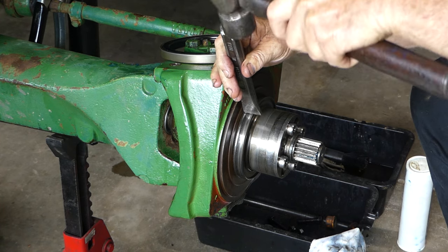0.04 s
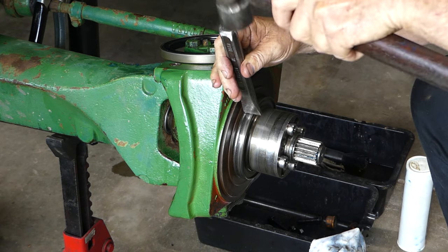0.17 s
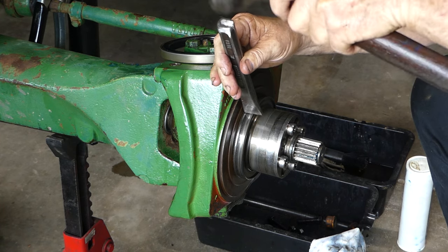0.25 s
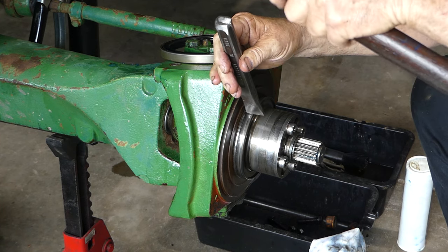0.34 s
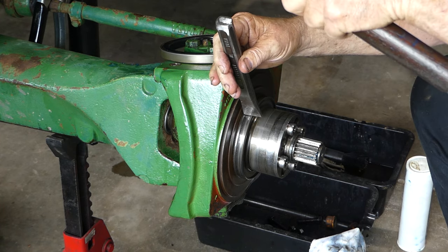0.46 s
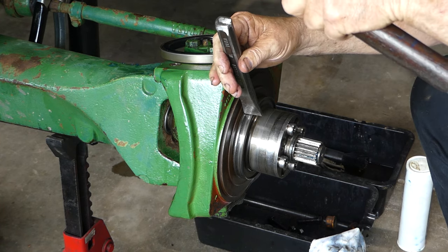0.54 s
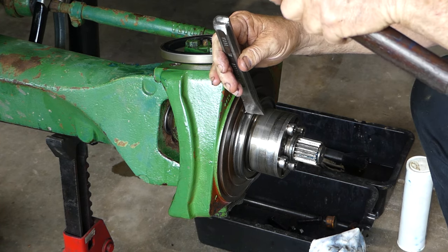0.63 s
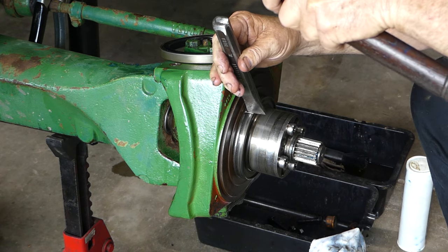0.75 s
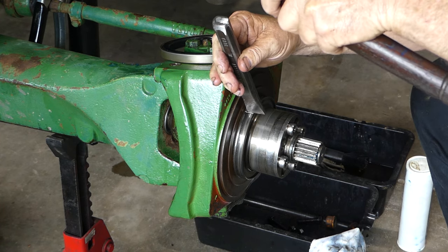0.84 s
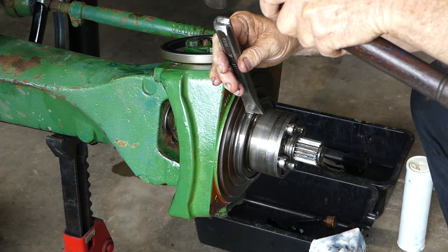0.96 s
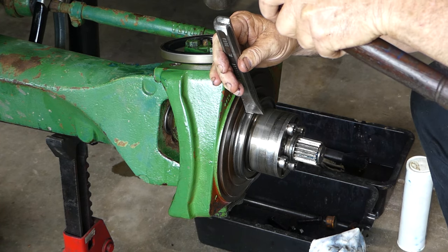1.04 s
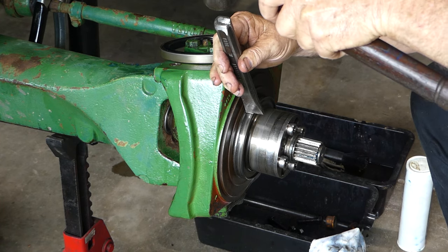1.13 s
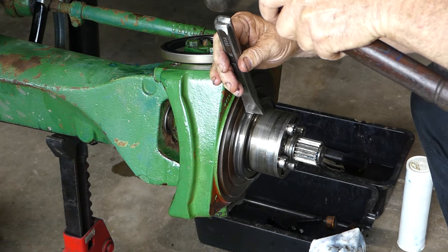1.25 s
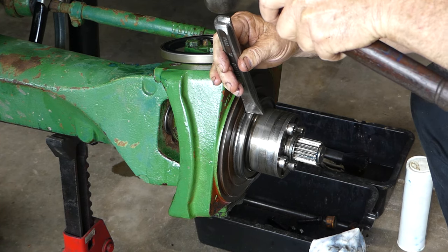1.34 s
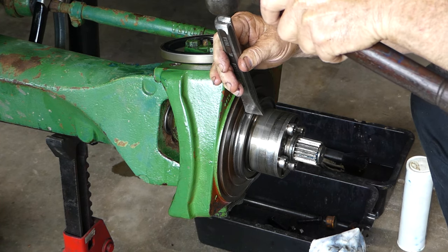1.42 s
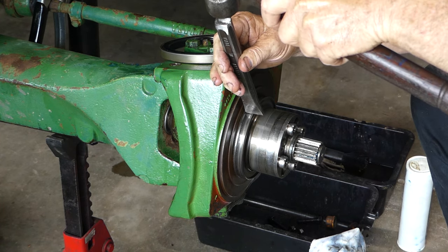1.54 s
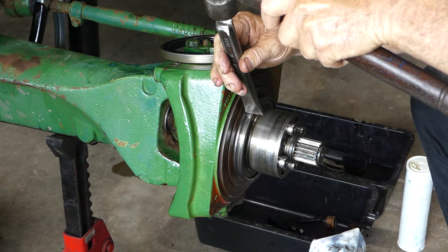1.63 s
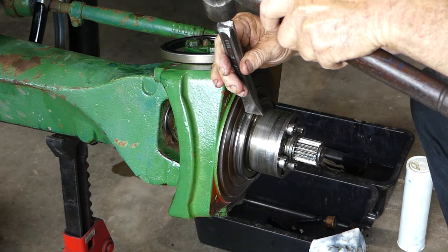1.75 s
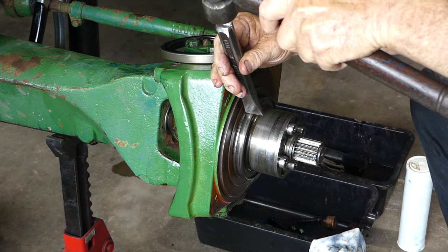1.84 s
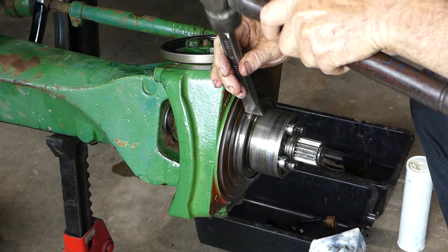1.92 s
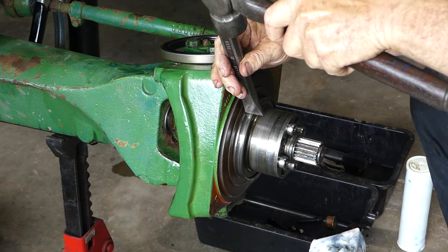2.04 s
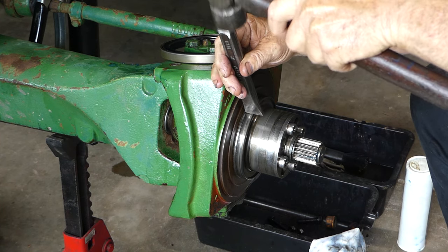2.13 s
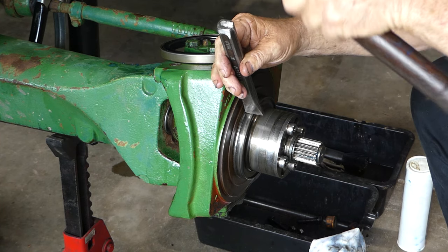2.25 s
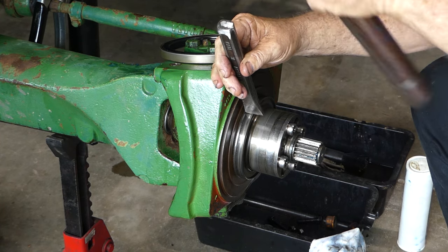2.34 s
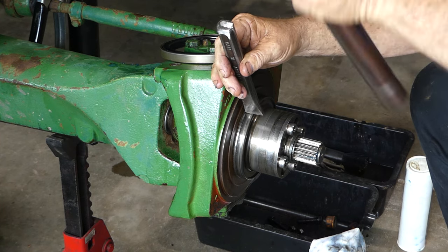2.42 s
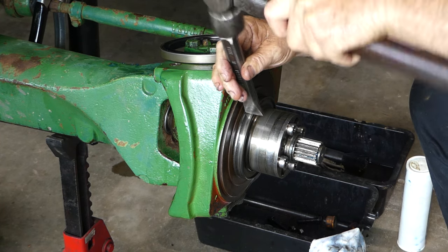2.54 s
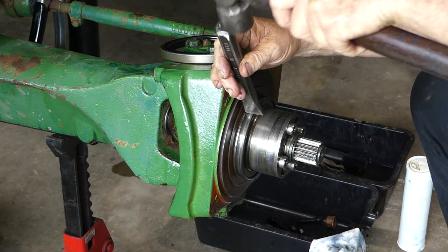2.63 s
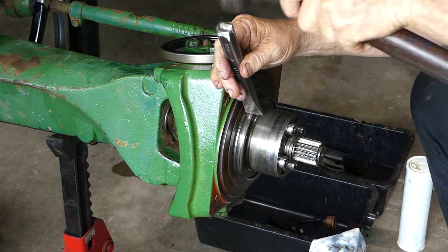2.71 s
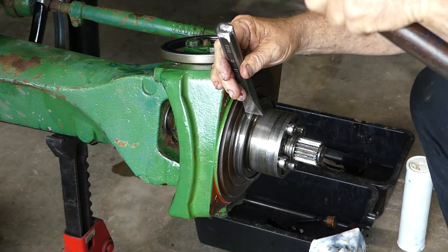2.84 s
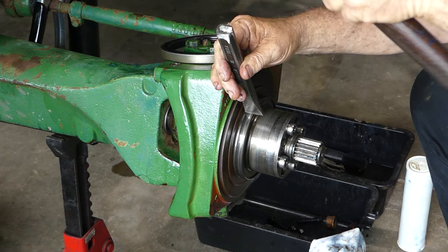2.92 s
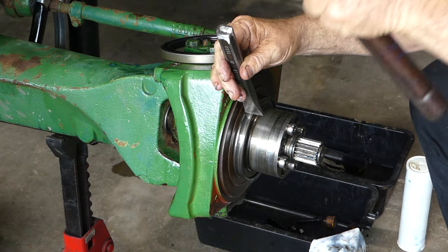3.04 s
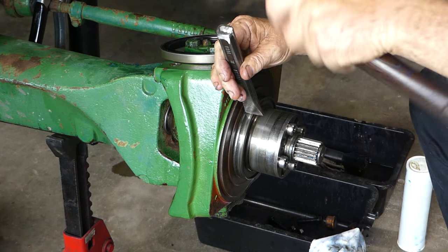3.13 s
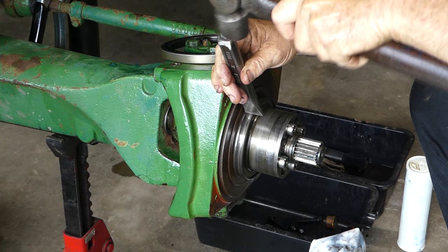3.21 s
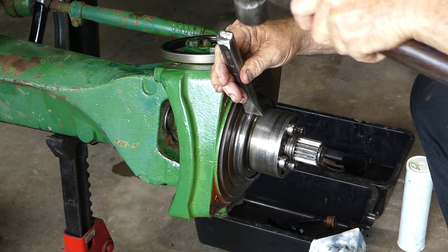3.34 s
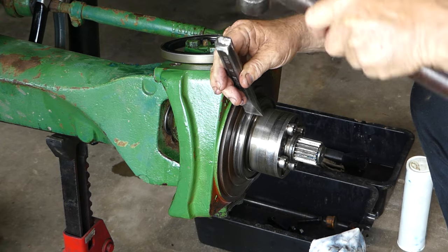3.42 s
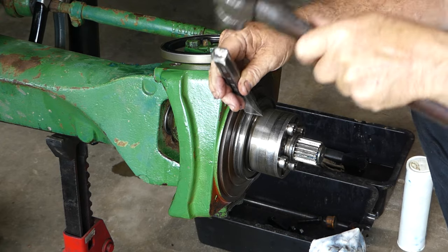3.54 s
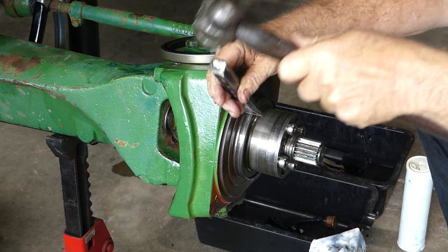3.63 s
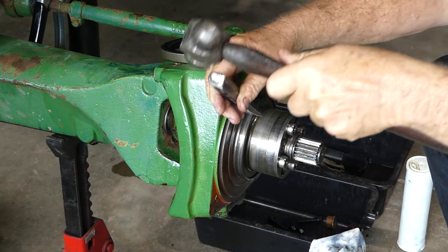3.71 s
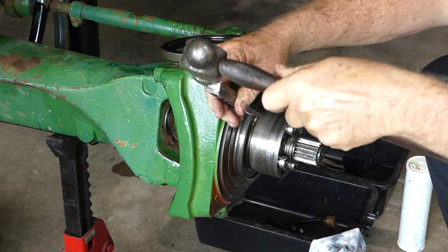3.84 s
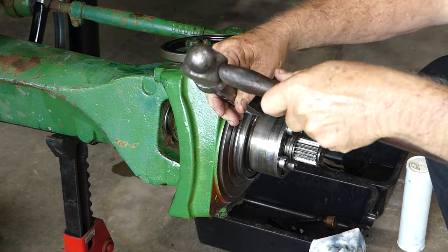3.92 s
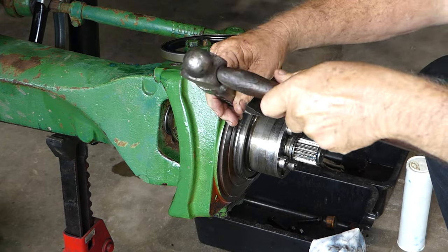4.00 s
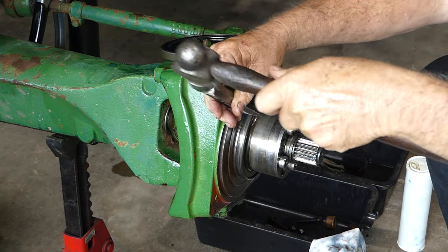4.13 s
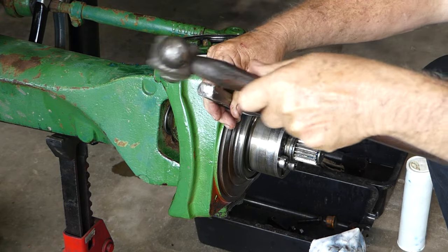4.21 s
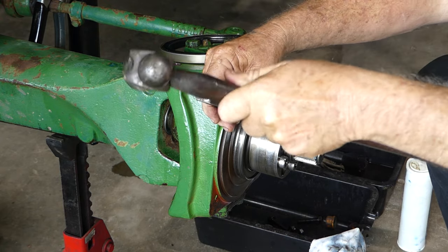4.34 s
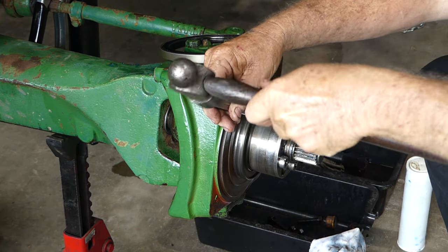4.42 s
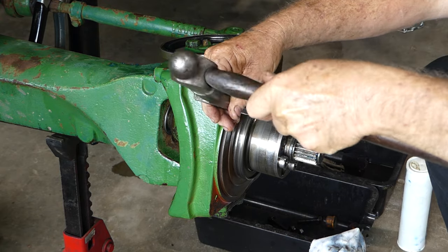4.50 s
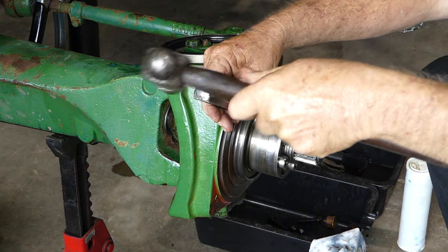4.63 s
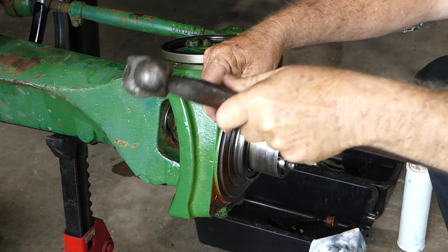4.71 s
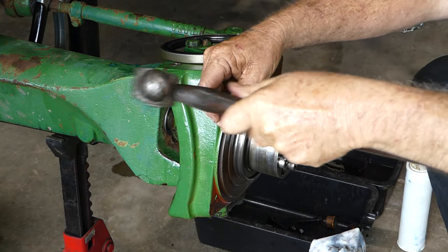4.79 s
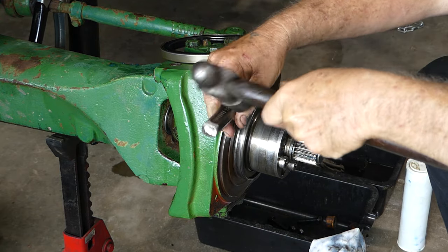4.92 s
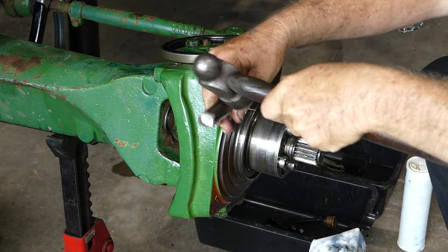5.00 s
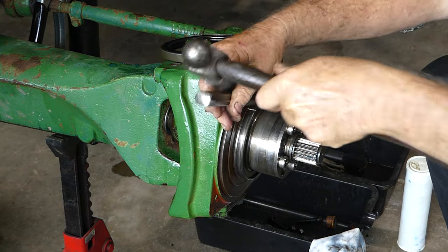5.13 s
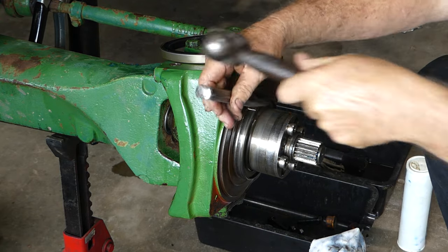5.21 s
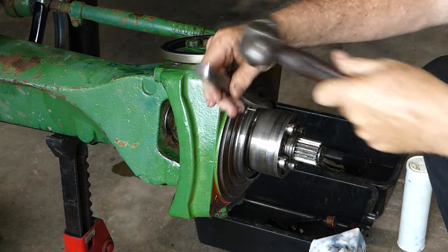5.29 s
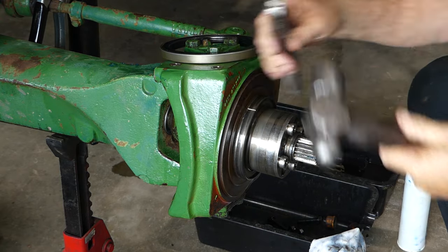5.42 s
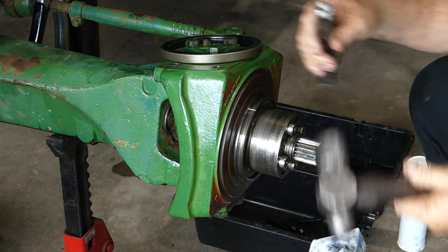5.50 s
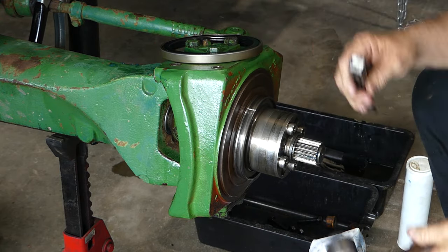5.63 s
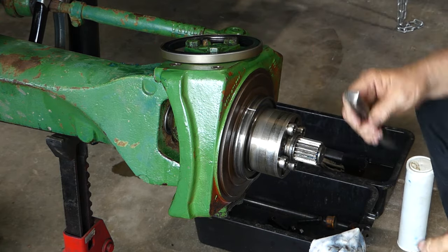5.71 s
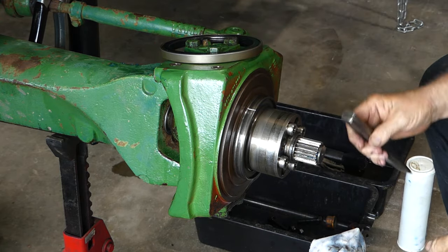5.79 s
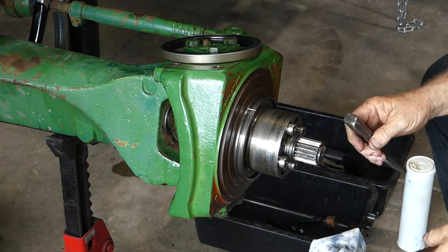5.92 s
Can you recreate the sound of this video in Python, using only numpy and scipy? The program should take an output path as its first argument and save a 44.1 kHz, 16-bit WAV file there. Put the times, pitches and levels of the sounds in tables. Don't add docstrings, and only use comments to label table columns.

```python
import sys
import numpy as np
from scipy import signal
from scipy.fft import rfft, irfft
from scipy.io import wavfile
from scipy.ndimage import uniform_filter1d, minimum_filter1d

SR = 44100
rng = np.random.default_rng(int(sys.argv[2]) if len(sys.argv) > 2 else 0)


def file_out(sig):
    cols = np.atleast_2d(sig).T
    lim = np.clip(cols, -1, 1)
    pcm = np.round(lim * 32767).astype(np.int16)
    wavfile.write(sys.argv[1], SR, pcm)


def invert_db(level):
    return 10 ** (np.asarray(level, dtype=float) / 20)


N = 262647

# (time [s], crack [dB], housing [dB], hub [dB], hammer head [dB])
BLOWS = [
    (.024, 12.5, -16, -16.5, -9.5),
    (1.434, -33.5, -51.5, -39, -70),
    (2.0124, -4, -30, -16.5, -47),
    (2.5868, 13.5, -12, -12.5, -17.5),
    (3.2079, 10.5, -12, -21.5, -25.5),
    (3.959, -0.5, -31.5, -16, -46.5),
    (4.4724, 9.5, -21, -5, -37),
    (4.921, 9, -26.5, -13.5, -8.5),
]
BLOW_S, CRACK_DB, HOUSING_DB, HUB_DB, HAMMER_DB = np.transpose(BLOWS)
# (frequency [Hz], density [dB per Hz])
AMBIENCE = [(15, -22), (30, -9), (60, 0), (120, 1), (270, 0), (500, -6), (1000, -13), (2000, -21),
            (4000, -23), (5600, -25), (6600, -31), (8000, -36), (13000, -39), (16000, -42)]
SOFT_BLOW_TILT = 0.07


def at_hz(points, hz):
    table_hz, values = np.array(points)[:, 0], np.array(points)[:, 1]
    return np.interp(np.log(hz), np.log(table_hz), values)


def coloured(spectrum, count):
    hz = np.maximum(np.fft.rfftfreq(count, 1 / SR), 5)
    x = irfft(rfft(rng.standard_normal(count)) * invert_db(at_hz(spectrum, hz)), count)
    return x / x.std()


def add(out, s, sound):
    i = round(s * SR)
    out[i:i + len(sound)] += sound[:N - i]


def struck(hz, db, t60, damped_s=9.):
    contact_s, choke_s = .0003, .002
    t = np.arange(int(min(1.3 * np.max(t60), damped_s + .01) * SR)) / SR
    hz, db, t60 = (np.reshape(v, (-1, 1)) for v in (hz, db, t60))
    swell = 1 - np.exp(-t / contact_s)
    choke = np.exp(-np.maximum(t - damped_s, 0) / choke_s)
    modes = invert_db(db - 60 * t / t60) * np.sin(2 * np.pi * hz * t)
    return swell * choke * np.sum(modes, axis=0)


def until_next(rows):
    return np.diff([row[0] for row in rows] + [N / SR])


def body(modes, levels_db, spread_db, tilt=0.):
    out = np.zeros(N)
    hz, db, t60 = np.transpose(modes)
    luck = rng.standard_normal((len(BLOWS), len(modes)))
    for s, level_db, chance in zip(BLOW_S, levels_db, luck):
        duller_db = tilt * (level_db - max(levels_db)) * np.log2(hz / 600)
        add(out, s, struck(hz, db + level_db + duller_db + spread_db * chance, t60))
    return out


def cracks():
    # (frequency [Hz], density [dB per Hz])
    crack_colour = [(90, -43.5), (180, -16.5), (520, -4.5), (1700, -5.5), (3300, 0.5), (5000, -1),
                    (7400, -4), (9000, -18), (12500, -22.5), (15000, -15), (17000, -24.5)]
    soft_ms, hard_ms, hard_from_db = 1.5, 3.7, 7.5
    near, far, t = np.zeros(N), np.zeros(N), np.arange(4096) / SR
    hz = np.maximum(np.fft.rfftfreq(4096, 1 / SR), 5)
    cepstrum = irfft(np.log(invert_db(at_hz(crack_colour, hz))))
    click = irfft(np.exp(rfft(cepstrum * np.r_[1, np.full(2047, 2), 1, np.zeros(2047)])))
    for s, db in zip(BLOW_S, CRACK_DB):
        ms = soft_ms + (hard_ms - soft_ms) * np.clip(db / hard_from_db, 0, 1)
        burst = invert_db(db - 10) * coloured(crack_colour, count=4096) * np.exp(-1000 * t / max(ms, .5))
        add(near, s, burst)
        add(far, s, click * np.linalg.norm(burst) / np.linalg.norm(click))
    return near, far


def chisel():
    # (time [s], first mode [dB], second mode [dB], first mode frequency [Hz])
    flat = [(0.024, -7.5, 1.5, 2450), (0.0468, -7, -4, 2483), (0.4877, -36.5, -50.5, 2310),
            (.801, -44, -53.5, 2273), (1.4331, -21.5, -28, 2300), (2.013, -8, -6, 2610),
            (2.587, -24.5, 2, 2375), (2.6164, -19, -17, 2405), (3.2095, -26, -7, 2264),
            (3.2504, -15, -19, 2310), (3.9594, -19.5, -24.5, 2395), (4.0992, -45, -67, 2460),
            (4.4713, -15, -15, 2640), (4.9218, -7, -7, 2290), (5.003, -13.5, -38.5, 2313),
            (5.01, -17, -20, 2274), (5.083, -24, -33, 2384)]
    # (frequency [Hz], ring time against the first mode [ratio])
    flat_upper = [(5830, 1), (10190, 0.91)]
    # (time [s], first mode [dB], second mode [dB])
    edge = [(0.0257, -23.5, -11.5), (.8011, -60.5, -66), (2.0145, -15, -24), (2.5867, -26, -10.5),
            (3.208, -37, -20), (3.2525, -35, -33.5), (4.4711, -18, -16), (4.9195, -5, -14),
            (4.9457, -14.5, -12.5), (4.9793, -15, -14.5), (5.003, -28.5, -33), (5.0878, -29, -34)]
    edge_hz = [2939, 7418]
    # (time [s], level [dB], frequency [Hz], t60 [s])
    axial = [
        (.026, -22.5, 7925, .5),
        (.082, -44, 7925, .3),
        (1.4348, -56.5, 7985, .17),
        (2.0128, -29.5, 8130, 0.058),
        (2.589, -21, 7940, 0.13),
        (3.2085, -28, 7960, 0.045),
        (3.9605, -31.5, 8020, 0.092),
        (4.9215, -16.5, 7924, 0.27),
    ]
    landings_s = [
        4.9794,
        5.034,
        5.106,
    ]
    left_db, left_t60_s = [-53, -43, -55], [.33, 0.8, 0.56]
    loose_from_s = 4.9
    held_t60_s, loose_t60_s, press_damping = 0.064, .15, 6.1
    held_third_db, loose_third_db = -32.5, -11
    edge_held_t60_s, edge_loose_t60_s = .035, 0.12
    free_hz, grip_stiffening = 2290, .3
    # (frequency [Hz], density [dB per Hz])
    grip = [(5, 0), (90, 0), (250, -14), (1000, -50)]

    out = np.zeros(N)
    upper_hz, longer = np.transpose(flat_upper)
    rings = [(s, left_db, free_hz, left_t60_s) for s in landings_s]
    for s, first_db, second_db, hz in flat:
        loose = s > loose_from_s
        t60, third_db = (loose_t60_s, loose_third_db) if loose else (held_t60_s, held_third_db)
        pressed_t60 = t60 * (free_hz / hz) ** press_damping
        rings.append((s, [first_db, second_db, second_db + third_db], hz, pressed_t60 * np.array([1, *longer])))
    rings.sort(key=lambda ring: ring[0])
    for (s, db, hz, t60), free_s in zip(rings, until_next(rings)):
        raised_hz = upper_hz * (hz / free_hz) ** grip_stiffening
        add(out, s, struck([hz, *raised_hz], db, t60, free_s))
    for (s, *db), free_s in zip(edge, until_next(edge)):
        t60 = edge_loose_t60_s if s > loose_from_s else edge_held_t60_s
        add(out, s, struck(edge_hz, db, [t60, t60], free_s))
    for (s, db, hz, t60), free_s in zip(axial, until_next(axial)):
        add(out, s, struck(hz, db, t60, free_s))
    return out * invert_db(1.6 * coloured(grip, count=N))


def hammer_head():
    # (frequency [Hz], level [dB], t60 [s])
    head_modes = [(9500, -6.5, 0.013), (10150, -5.5, .015), (11300, -12, 0.0066), (13370, -19, .06),
                  (14140, -13, .17), (14900, -2, .025), (15600, -5, .02)]
    return body(head_modes, HAMMER_DB, spread_db=3.0)


def hub():
    # (frequency [Hz], level [dB], t60 [s])
    hub_modes = [(1930, -7, .025), (2280, -6, 0.031), (2620, -5, 0.033), (2980, -7, .015),
                 (3255, -5.5, 0.031), (3366, -10, 0.039), (3590, -6, .02), (3700, -5, .022),
                 (4070, -7, 0.014), (4380, -10, .012)]
    # (frequency [Hz], level [dB], t60 [s])
    flange_modes = [(4640, 1.5, 0.047), (5100, -4, .022), (5230, -1.5, .03), (5440, -8, .02),
                    (6225, -9, .028), (6540, -10, .02), (6960, -13, .015), (8790, -26, .015)]
    return body(hub_modes, HUB_DB, spread_db=3.5) + body(flange_modes, HOUSING_DB + 2.5, spread_db=0.5)


def housing():
    # (frequency [Hz], level
    # [dB], t60 [s])
    housing_modes = [(118.4, -19.5, 0.5), (268.5, -18, 0.98), (338.5, -3, 0.31), (453.4, -20, 0.79),
                     (534, -9, 0.45), (648, -25.5, 0.96), (763, -8.5, 0.45), (874, -12, 1.3),
                     (1109, -20.5, 1.1), (1306, -13.5, 0.63), (1475, -21, 0.66), (1590, -18.5, 1.1),
                     (1771, -14.5, 0.62), (1890, -32, 0.95), (2099, -32.5, 0.89), (2200, -17.5, 0.5),
                     (2245, -33.5, 0.82), (2336, -29.5, 0.71), (2449, -37, 1.2),
                     (329, -28.5, 3.4), (459, -27.5, 1.6), (453, -5, .25), (645, -4.5, .15), (1592, 4, .12),
                  (1770, -6, 0.19)]
    return body(housing_modes, HOUSING_DB - 5.5, spread_db=3.0, tilt=SOFT_BLOW_TILT)


def thuds():
    # (frequency [Hz], density [dB per Hz])
    thud_colour = [(30, -35), (70, -8), (120, -5), (330, -0.5), (600, 1.5), (1300, -1.5), (1700, -1.5),
                   (3000, -13), (8000, -48.5)]
    levels_db = HOUSING_DB + 2.5
    out, t = np.zeros(N), np.arange(8192) / SR
    shape = (1 - np.exp(-t / 0.0043)) * np.exp(-t / 0.033)
    for s, level_db in zip(BLOW_S, levels_db):
        tilt = SOFT_BLOW_TILT * (level_db - max(levels_db))
        tilted = [(hz, db + tilt * np.log2(hz / 600)) for hz, db in thud_colour]
        add(out, s, invert_db(level_db) * coloured(tilted, count=8192) * shape)
    return out


def ticks():
    # (time [s], level [dB])
    knock_times = [
        (5.526, -33.5),
        (2.616, -22),
        (3.252, -20),
        (4.477, -11.5),
        (4.948, -19.5),
        (4.981, -13.5),
        (5.013, -22),
        (5.088, -32),
    ]
    # (frequency [Hz], level [dB], t60 [s])
    knock_modes = [(1110, -0.5, 0.0043), (1700, -1.5, 0.0058), (4000, -7, .004), (8500, -8.5, 0.0059),
                   (15030, -34, .02)]
    out = np.zeros(N)
    hz, db, t60 = np.transpose(knock_modes)
    for s, level_db in knock_times:
        add(out, s, struck(hz, db + level_db, t60))
    return out


def workshop(x):
    # (frequency [Hz], t60 [s])
    shop_t60 = [(60, 2.2), (250, 0.83), (1000, 1.02), (3000, 0.92), (6000, 0.84), (9000, 0.73),
                (16000, 0.29)]
    # (frequency [Hz], level [dB])
    shop_colour = [(60, 5.5), (250, 10), (1000, 4.5), (3000, 2), (7000, -1.5), (10000, -2.5), (16000, -1.5)]
    shop_db, build_s = -2, 0.004
    t = np.arange(int(1.6 * SR)) / SR
    edges = 40 * 2 ** np.arange(0, 9, .5)
    white, tail = rng.standard_normal((2, len(t))), 0
    for k, (low, high) in enumerate(zip(edges, edges[1:])):
        hz = np.sqrt(low * high)
        band_pass = signal.butter(2, [low, high], "band", fs=SR, output="sos")
        band = signal.sosfilt(band_pass, white[k % 2])
        build = 1 - np.exp(-t / (build_s + 2.4 / hz))
        tail = tail + band * build * invert_db(at_hz(shop_colour, hz) - 60 * t / at_hz(shop_t60, hz))
    return signal.fftconvolve(x, tail * invert_db(shop_db - 43.5))[:N]


def room_tone():
    return invert_db(-59.5) * coloured(AMBIENCE, count=N)


def scene():
    crack, far_crack = cracks()
    tools = chisel()
    casting = housing()
    knocks = ticks() + thuds() + hub() + hammer_head()
    echo = workshop(far_crack + knocks + invert_db(-3.5) * casting + invert_db(-9.5) * tools)
    air = crack + knocks + casting + tools + echo + room_tone()
    return np.array([air, air])


def held(db, hold_s, fall_db_per_s):
    size = int(hold_s * SR)
    kept = -minimum_filter1d(-db, size=size, origin=(size - 1) // 2)
    ramp = fall_db_per_s * np.arange(N) / SR
    return np.maximum.accumulate(kept + ramp) - ramp


def band_limit(x):
    return signal.sosfilt(signal.butter(12, 16450, fs=SR, output="sos"), x)


def record(dry):
    knee = 5
    x = dry * invert_db(3.0)
    x = x / (1 + np.abs(x) ** knee) ** (1 / knee)
    level_db = 20 * np.log10(uniform_filter1d(x[0] ** 2, size=96) + 1e-9) / 2
    over_db = np.maximum(level_db + 9, 0)
    quick = held(np.minimum(over_db * 1.1, 4.0), hold_s=.02, fall_db_per_s=130)
    lingering = held(np.minimum(over_db * 3.0, 1.5), hold_s=0.084, fall_db_per_s=21)
    duck_db = signal.lfilter([.03], [1, -.97], quick + lingering)
    x = np.array([x[0], x[1] * invert_db(-1.67 - duck_db)])
    hiss = invert_db(-77) * np.array([coloured(AMBIENCE, count=N) for side in range(2)])
    low_pass = signal.cheby2(10, 50, 16500, fs=SR, output="sos")
    x = signal.sosfilt(low_pass, x + hiss)
    return band_limit(np.clip(x, -1, 1))


dry = scene()
out = record(dry)
file_out(out)
```